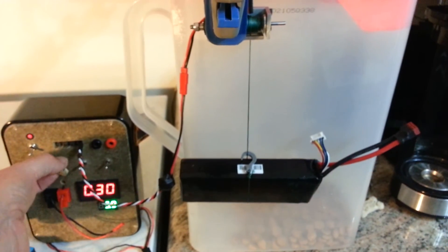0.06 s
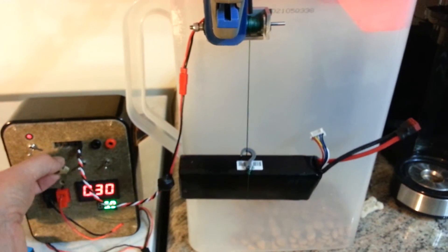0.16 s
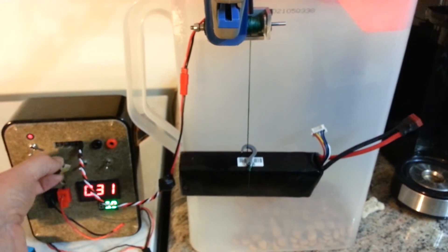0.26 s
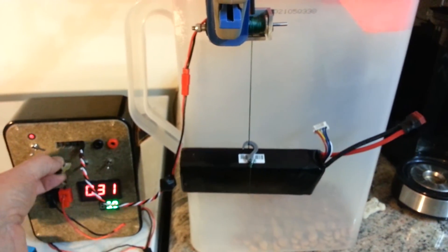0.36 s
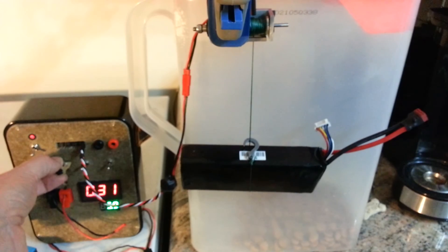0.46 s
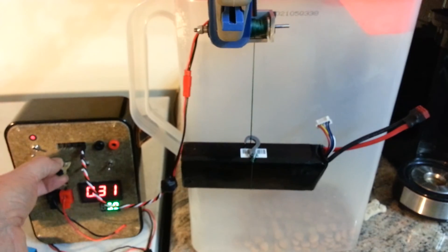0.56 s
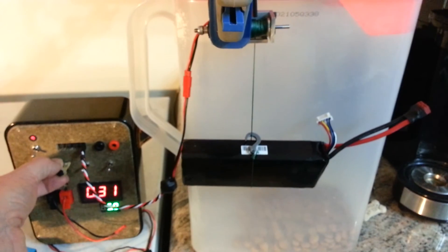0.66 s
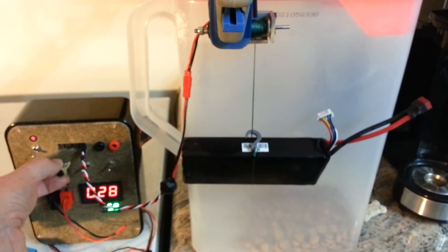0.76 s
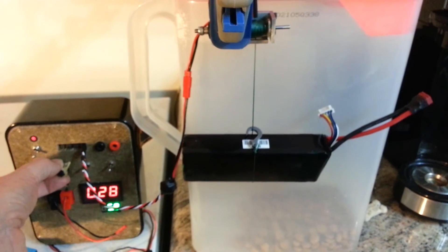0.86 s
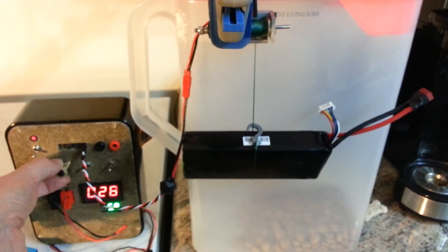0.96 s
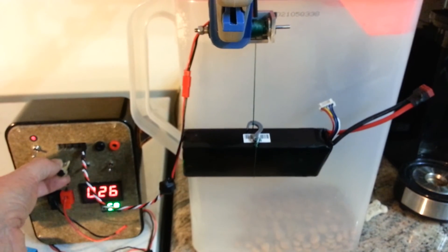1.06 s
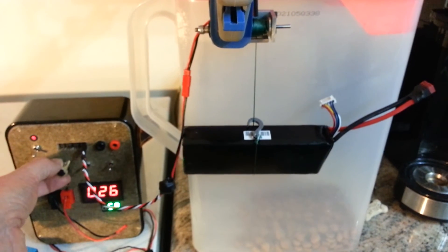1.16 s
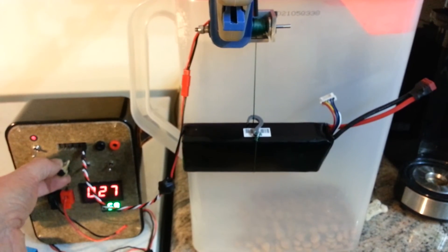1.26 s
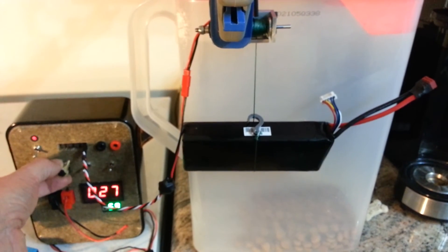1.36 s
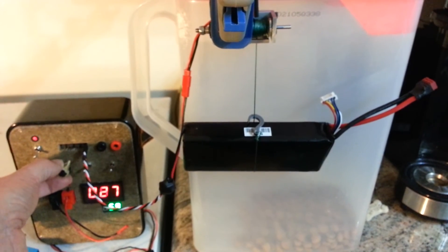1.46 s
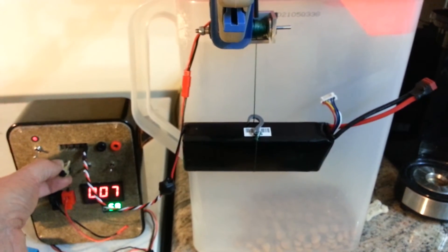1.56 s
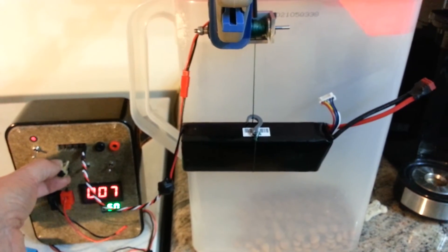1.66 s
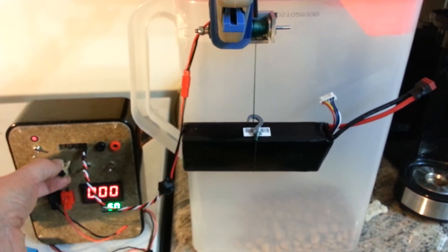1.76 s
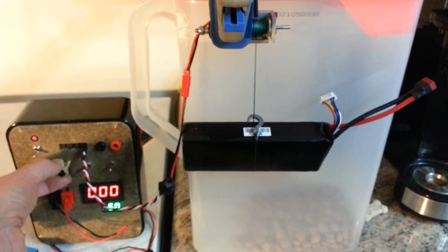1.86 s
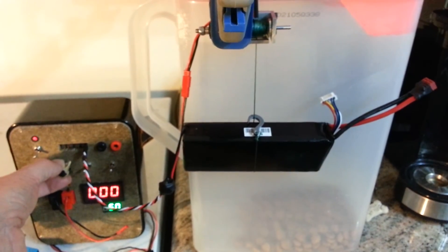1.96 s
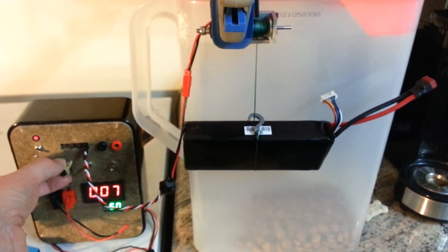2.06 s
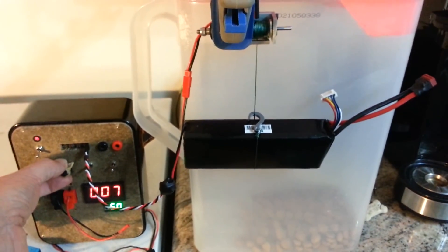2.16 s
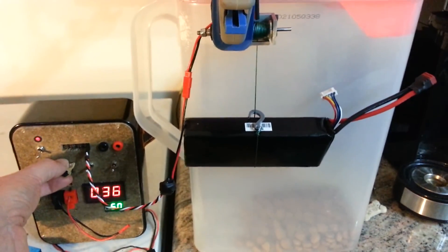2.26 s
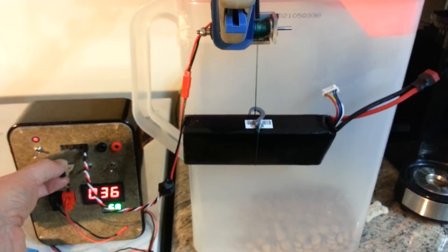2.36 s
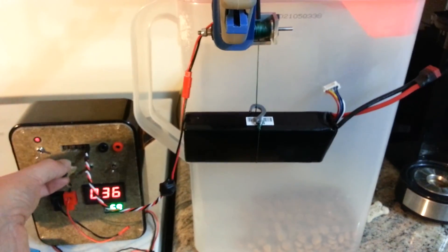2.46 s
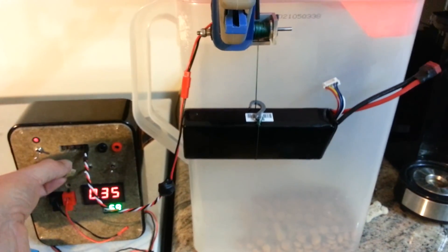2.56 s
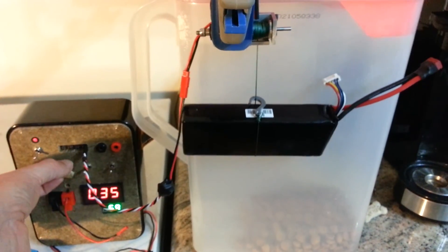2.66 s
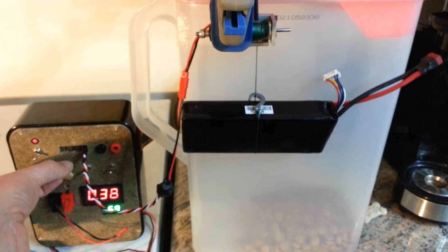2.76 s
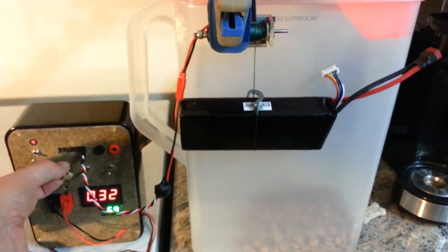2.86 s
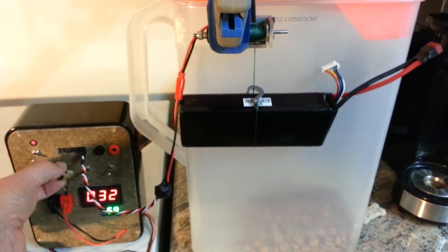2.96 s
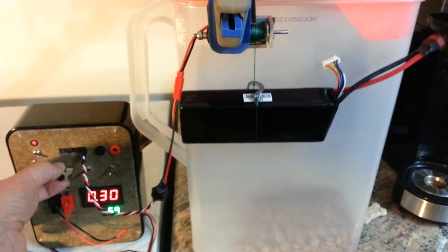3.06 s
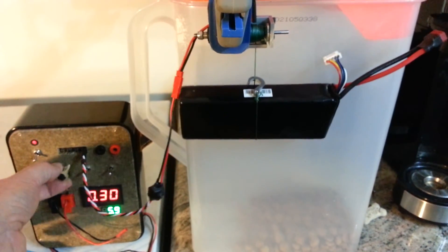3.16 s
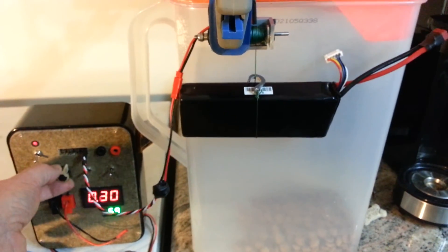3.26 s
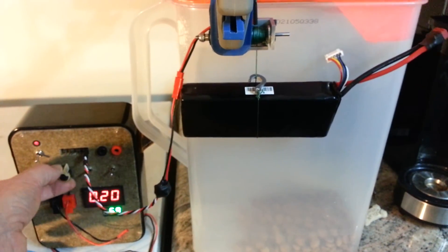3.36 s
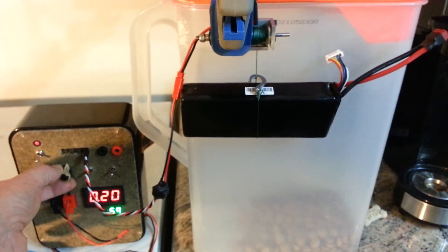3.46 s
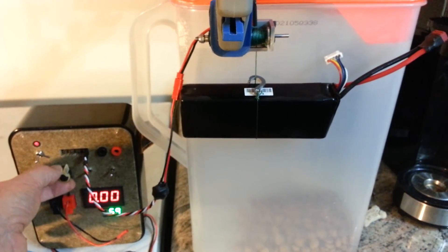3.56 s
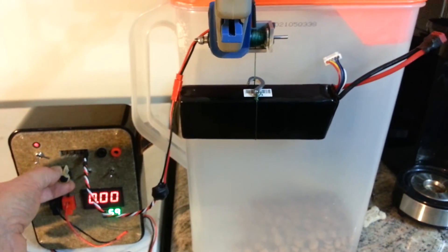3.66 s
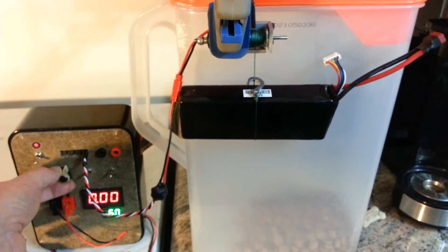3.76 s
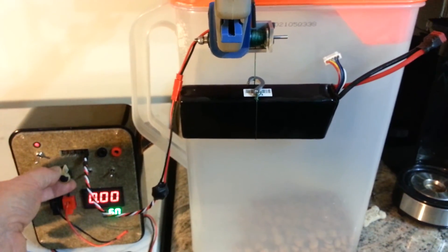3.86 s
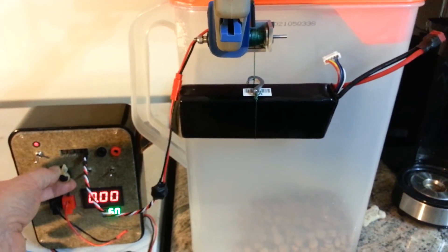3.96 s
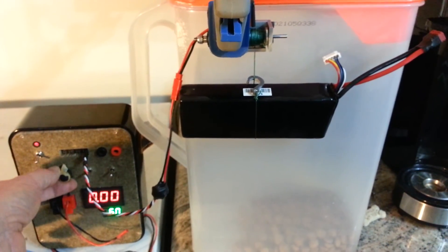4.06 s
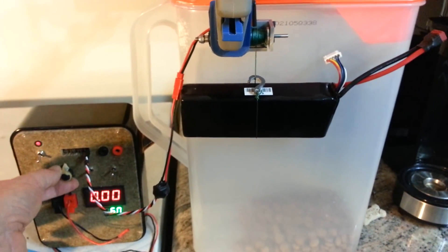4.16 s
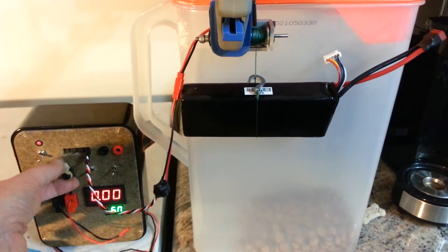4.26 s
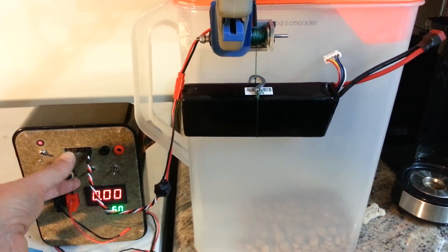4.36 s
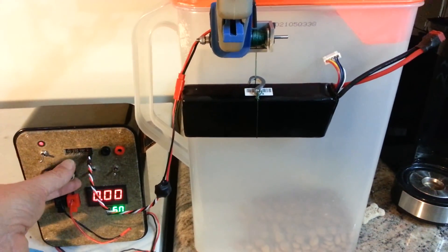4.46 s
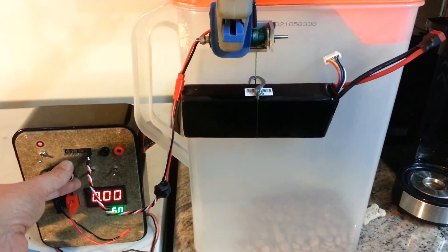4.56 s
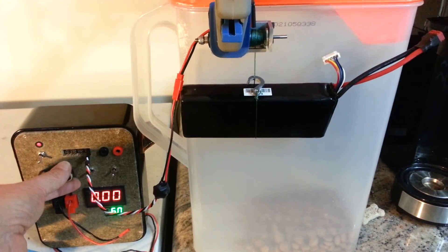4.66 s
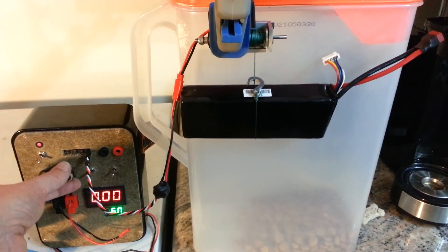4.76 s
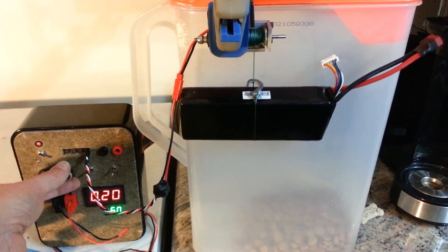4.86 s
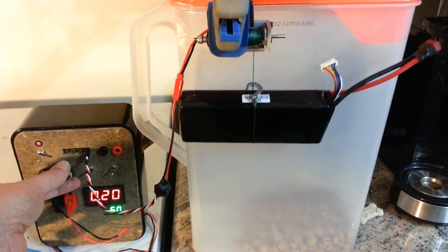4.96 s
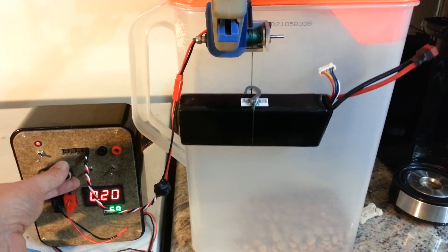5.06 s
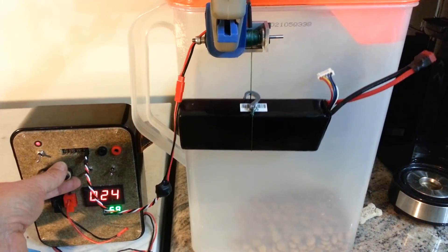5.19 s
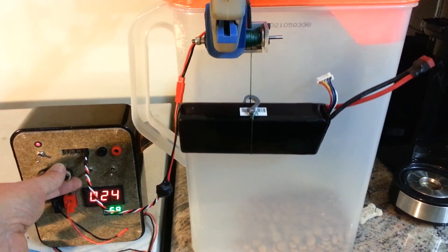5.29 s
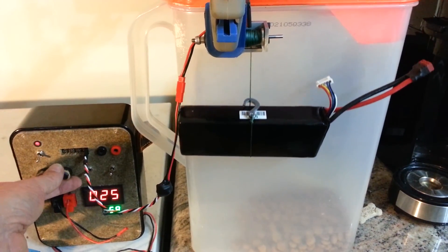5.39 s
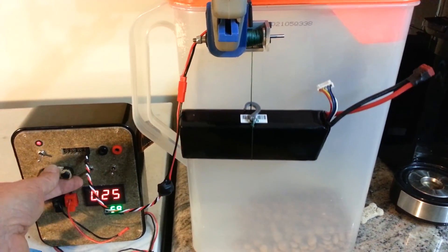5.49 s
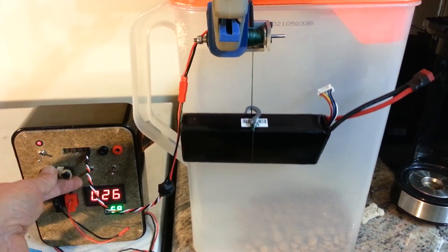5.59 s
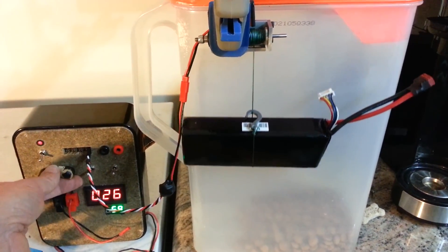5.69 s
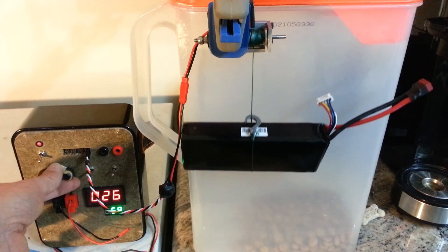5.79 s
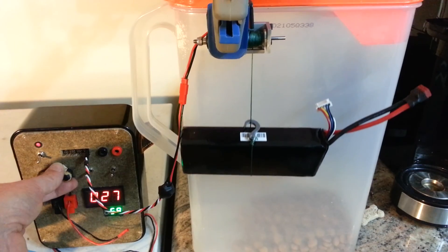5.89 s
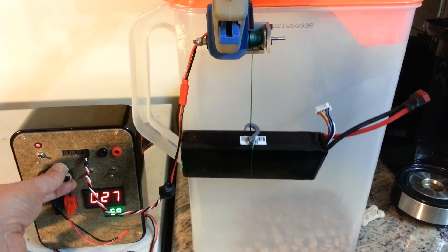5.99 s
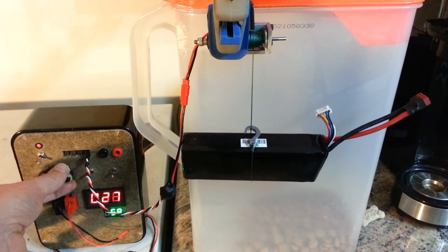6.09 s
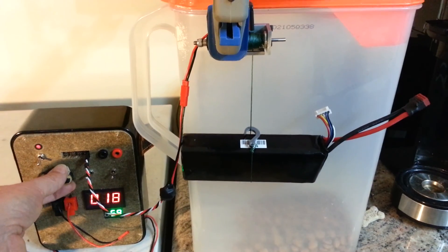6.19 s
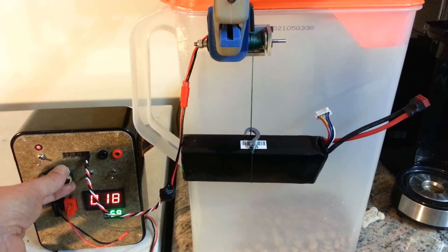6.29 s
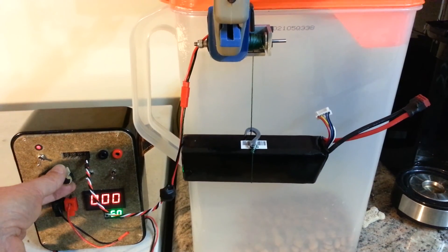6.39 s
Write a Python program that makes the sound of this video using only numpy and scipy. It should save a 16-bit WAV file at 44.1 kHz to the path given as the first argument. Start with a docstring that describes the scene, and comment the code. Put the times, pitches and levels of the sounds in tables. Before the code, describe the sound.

A tiny geared electric motor whines and rattles in three short runs, its pitch rising and falling, in a quiet kitchen.

```python
"""First comes the high whine of a tiny geared winch over a kitchen counter. It lifts a light load twice,
then lowers it. Its motor is fed in pulses, so the whine flutters at part throttle and turns pure near
full speed. The teeth rattle in the gearbox, more so when lowering, and the load and the hand give soft
bumps. Behind it all are a few faint ticks, soft air noise and the hum of an appliance."""
import sys
import numpy as np
from scipy import signal
from scipy.fft import rfft, irfft, next_fast_len
from scipy.io import wavfile

SR = 44100
rng = np.random.default_rng(int(sys.argv[2]) if len(sys.argv) > 2 else 0)


def generate_wav(signal):
    """Clip the signal to [-1, 1] and save it as 16-bit WAV at the path in sys.argv[1]."""
    frames = np.transpose(np.atleast_2d(signal))
    scaled = np.clip(frames, -1, 1) * 32767
    pcm = np.round(scaled).astype(np.int16)
    wavfile.write(sys.argv[1], SR, pcm)


N = 283563
TIME = np.arange(N) / SR
PADDED = next_fast_len(N + SR)
FREQS = np.maximum(np.fft.rfftfreq(PADDED, 1 / SR), 1)
PINION_TEETH, WHEEL_TEETH = 10, 61   # the small gear on the motor shaft, and the big one it drives
PULSE_HZ, FULL_SPEED_HZ = 61.2, 306   # supply pulses per second; shaft turns per second

# The hand turns the throttle for each lift. Each row: time in seconds, shaft turns per second.
FIRST_LIFT_SPEED = [(0, 299), (0.1, 299), (0.36, 295), (0.5, 288), (0.6, 270), (0.74, 247), (0.95, 224),
                    (0.99, 191), (1.27, 192), (1.343, 126)]
SECOND_LIFT_SPEED = [(1.952, 30.02), (2.08, 129.4), (2.18, 173.8), (2.3, 193.5), (2.6, 286.4),
                     (2.73, 300.9), (3.03, 301.3), (3.14, 291.9), (3.22, 250.5), (3.287, 165)]
# The tone colour of the rattle when lifting. Each row: frequency in Hz, relative level in dB.
LIFT_RATTLE = [(220, -7.5), (400, -6.5), (850, -24.5), (1200, -21.5), (1700, -17.5), (2500, -11),
               (3400, 1.5), (4600, 10), (5800, -0.5), (7200, -12.5), (8500, -14), (10800, -23),
               (12300, -18), (14000, -39)]


def lifts():
    """Winding in twice: the load holds the teeth together, so the whine is clear and the rattle even."""
    sound = 0
    for run, ring_db, rattle_db in ((FIRST_LIFT_SPEED, -25.5, -33), (SECOND_LIFT_SPEED, -26, -32)):
        levels = gear_levels(speed_of(run), hum_db=-50, whine_db=-30.5, whine_slope=27.5,
                             ring_db=ring_db, above_slope=39.5, rattle_db=rattle_db, rattle_slope=4.5)
        sound += winch(run, levels, LIFT_RATTLE, going_down=False,
                       rough=.2, slop=.076, looseness=.45, hiss_db=1.5)
    return sound


# The motor speed on the way down. Each row: time in seconds, shaft turns per second.
LOWERING_SPEED = [(4.73, 44.9), (4.77, 125.3), (4.86, 215.5), (4.96, 236.4), (5.13, 248.1), (5.3, 248.1),
                  (5.42, 281.3), (5.55, 293), (5.86, 286.8), (6, 235), (6.093, 176.1)]
# The tone colour of the rattle when lowering. Each row: frequency in Hz, relative level in dB.
LOWERING_RATTLE = [(220, -22.5), (400, -20), (850, -48.5), (1200, -35.5), (1700, -31), (2500, -20.5),
                   (3400, -12), (4600, 3), (5800, -8), (7200, -17.5), (8500, -25), (10800, -34.5),
                   (12300, -40), (14000, -60.5)]


def lowering():
    """Letting the load down: the teeth run loose, so they screech more and rattle harder with speed."""
    levels = gear_levels(speed_of(LOWERING_SPEED), hum_db=-54, whine_db=-31.5, whine_slope=19,
                         ring_db=-28.5, above_slope=14, rattle_db=-25, rattle_slope=7.5)
    return winch(LOWERING_SPEED, levels, LOWERING_RATTLE, going_down=True,
                 rough=.22, slop=.22, looseness=1.7, hiss_db=.5)


def winch(run, levels, colour, going_down, rough, slop, looseness, hiss_db):
    """One run of the motor: the gears whine, rattle and hiss, and the unbalanced shaft hums."""
    start, stop, speed = run[0][0], run[-1][0], speed_of(run)
    hum_db, whine_db, octave_db, rattle_db = levels
    running = np.clip(np.minimum((TIME - start) / .0028 + 1, (stop - TIME) / .024 + .5), 0, 1)
    pulse_age = (TIME - start) * PULSE_HZ % 1   # goes from 0 to 1 between supply pulses
    turns, load = shaft(speed, pulse_age)
    part_throttle = np.clip((FULL_SPEED_HZ - speed) / 70, .35, 1)
    singing = np.clip((speed - 80) / 60, 0, 1)   # very slow gears do not sing
    crawl = np.clip(1 - speed / 230, 0, 1)

    whine = from_db(whine_db) * gear_tone(turns, PINION_TEETH, rough, slop)
    whine += from_db(octave_db) * whine_octave(turns, part_throttle, looseness, rough, slop)
    whine += from_db(whine_db) * side_tones(turns, going_down, rough, slop)
    hum = from_db(hum_db) * gear_tone(turns, 1, rough=.06, slop=.015)
    tones = singing * (load * whine + hum)
    growl = bracket_growl(crawl)

    overtones = from_db(-9.5) * gear_tone(turns, 3 * PINION_TEETH, rough=.4, slop=.6)
    overtones += from_db(-15) * gear_tone(turns, 4 * PINION_TEETH, rough=.4, slop=.57)
    overtones *= singing * load * part_throttle
    force = running * from_db(rattle_db) * jolts(crawl, pulse_age)
    rattle = coloured(force * (tooth_knocks(turns) + overtones), colour)
    hiss = coloured(force * rng.standard_normal((2, N)), colour)   # the teeth slide over each other
    return gear_colour(running * (tones + growl) + rattle, hiss, hiss_db)


def speed_of(run):
    """Shaft turns per second at every sample."""
    return np.interp(TIME, *np.transpose(run))


def shaft(speed, pulse_age, max_flutter_hz=11.5):
    """Turns made and load on the teeth: each pulse speeds the motor up, then it coasts until the next."""
    duty = np.clip((speed / FULL_SPEED_HZ) ** 3, .15, .85)   # share of the time the power is on
    sawtooth = 2 * np.minimum(pulse_age / duty, (1 - pulse_age) / (1 - duty)) - 1
    flutter = np.clip(.33 * (FULL_SPEED_HZ - speed), 0, max_flutter_hz) * sawtooth
    turns = np.cumsum(speed * (1 + .00331 * drift(150)) + flutter) / SR
    wheel_turns = turns * PINION_TEETH / WHEEL_TEETH
    off_centre = 1 + .088 * np.sin(2 * np.pi * wheel_turns)
    return turns, (1 + .024 * flutter) * off_centre


def gear_tone(turns, per_turn, rough, slop):
    """A tone locked to the shaft. Play in the gears shakes its level (rough) and its timing (slop)."""
    return np.sqrt(2) * (1 + rough * drift(260)) * np.sin(2 * np.pi * per_turn * turns + slop * drift(520))


def whine_octave(turns, part_throttle, looseness, rough, slop):
    """The octave above the whine: a clean tone, strongest at part throttle, and a loose-tooth screech."""
    screech = gear_tone(turns, 2 * PINION_TEETH, rough=.2, slop=1.4)
    clean = gear_tone(turns, 2 * PINION_TEETH, rough, 2 * slop)
    return part_throttle * clean + looseness * screech


# Side tone pitches. Each row: multiple of the shaft rate, added multiple of the second gear's tooth rate.
SIDE_PITCHES = [(0, 2), (5, 0), (0, 4), (0, 5), (10, -1), (11, 0), (10, 1), (10, 2), (15, 0), (10, 4),
                (10, 5)]
# Their levels against the whine. Each row: dB when lifting, dB when lowering.
SIDE_LEVELS = [(-31, -25), (-23, -26), (-24, -28), (-21, -22), (-20, -22), (-9, -7), (-9, -8), (-11, -2),
               (-15, -9), (-16, -8), (-22, -18)]


def side_tones(turns, going_down, rough, slop):
    """The wheel carries a second small gear, whose tooth rate mixes with the shaft rate into more tones."""
    second_gear = PINION_TEETH * PINION_TEETH / WHEEL_TEETH   # its teeth per turn of the motor
    tones = 0
    for (shaft_multiple, gear_multiple), (up_db, down_db) in zip(SIDE_PITCHES, SIDE_LEVELS):
        per_turn = shaft_multiple + gear_multiple * second_gear
        tones += from_db(down_db if going_down else up_db) * gear_tone(turns, per_turn, rough, slop)
    return tones


# The teeth briefly chatter harder on the way down.
# Each row: middle in seconds, extra level in dB, half length in seconds.
TOOTH_CHATTERS = [(4.968, 4.5, 0.03), (5.36, 2, 0.032)]


def gear_levels(speed, hum_db, whine_db, whine_slope, ring_db, above_slope, rattle_db, rattle_slope):
    """Hum, whine, octave and rattle levels in dB follow the speed. Slopes are in dB per octave."""
    octaves = np.log2(speed / FULL_SPEED_HZ)
    chatter = sum(db * bell(TIME, middle, half_length) for middle, db, half_length in TOOTH_CHATTERS)
    whine = whine_db + whine_slope * octaves + 1.5 * bell(speed, 296, 15)   # a resonance near full speed
    octave = octave_level(speed, ring_db, above_slope)
    creep_loss = 5 * np.clip(1 - speed / 135, 0, 1)   # slow teeth barely touch
    rattle = rattle_db + rattle_slope * octaves - creep_loss
    return hum_level(speed, hum_db), whine, octave + chatter, rattle + chatter


def octave_level(speed, ring_db, above_slope, below_slope=37, low_hz=3997, high_hz=4590):
    """The whine's octave is loudest in the band where the gearbox rings, and fades on either side."""
    hz = 2 * PINION_TEETH * speed
    below, above = np.maximum(np.log2([low_hz / hz, hz / high_hz]), 0)
    return ring_db - below_slope * below - above_slope * above


def hum_level(speed, base_db, db_per_octave=14):
    """The shaft's hum grows with speed and swells at two resonances of the mount."""
    swell_db = 11 * bell(speed, centre=296, width=37) + 12 * bell(speed, centre=206, width=22)
    return base_db + db_per_octave * np.log2(speed / FULL_SPEED_HZ) + swell_db


def tooth_knocks(turns, chance=.92, pinion_share=.47):
    """One knock per tooth. Its strength is partly random and partly repeats as each gear comes round."""
    teeth = turns * PINION_TEETH
    at = np.flatnonzero(np.diff(np.floor(teeth)))   # the sample just before each knock
    tooth, step = teeth[at + 1].astype(int), teeth[at + 1] - teeth[at]
    wheel, pinion = rng.standard_normal(WHEEL_TEETH), rng.standard_normal(PINION_TEETH)
    force = (wheel - wheel.mean())[tooth % WHEEL_TEETH]
    force += pinion_share * rms_one(pinion - pinion.mean())[tooth % PINION_TEETH]
    force += chance * rng.standard_normal(N)[tooth]
    force = rms_one(force) / np.sqrt(step)
    late = (tooth - teeth[at]) / step   # knocks fall between samples
    return rms_one(np.bincount(at, force * (1 - late), N) + np.bincount(at + 1, force * late, N))


def jolts(crawl, pulse_age, strength=2.4, decay=3.3):
    """At a crawl, each supply pulse throws the gears across their slack, so the rattle throbs."""
    return 1 + strength * crawl * (np.exp(-decay * pulse_age) - 1 / decay)


def bracket_growl(crawl):
    """The bracket growls softly while the motor crawls."""
    return from_db(-55) * np.sqrt(crawl) * rms_one(band(rng.standard_normal(N), 685, 1026))


# Peaks and dips in the tone colour of the gear sound. Each row: frequency in Hz, width in Hz, gain in dB.
GEAR_PEAKS_AND_DIPS = [(563, 122, -5.5), (885, 290, 10.5), (1080, 720, -7.5), (2670, 150, 2.5),
                       (2780, 106, -14.5), (3430, 44, 2), (4100, 53, 12.5), (4180, 280, -9.5),
                       (3860, 31, 4), (4610, 170, -2), (5170, 96, 2), (5000, 30, 7), (5380, 24, 10.5),
                       (7140, 300, 5)]
# Which side is louder. Each row: frequency in Hz, left minus right in dB.
STEREO_BALANCE = [(300, 0.5), (850, 2.5), (1230, -4.5), (2400, 3.5), (3000, -4), (3500, -0.5), (3800, 3),
                  (4300, -2.5), (4900, -7.5), (5400, -4.5), (6000, 2.5), (7200, 1), (9000, 4.5),
                  (12000, 5.5)]
# Which side the gear sound reaches first. Each row: frequency in Hz, lead of the left in radians.
STEREO_LEAD = [(860, 0), (1460, -1.5), (2240, -.1), (3010, -.5), (3900, -1.4), (4820, -2.2), (5900, -1.5),
               (7000, -.8), (8400, -1.7)]
# Extra colour for the hiss of the sliding teeth. Each row: frequency in Hz, relative gain in dB.
SLIDING_HISS = [(300, -6.5), (1200, 9.5), (3000, 7), (5500, -11.5), (9000, 2.5)]


def gear_colour(gears, hiss, hiss_db):
    """Tones swell and fade as they glide over peaks and dips, and reach each ear by a different path."""
    colour_db = sum(db / (1 + (2 * (FREQS - hz) / width) ** 2) for hz, width, db in GEAR_PEAKS_AND_DIPS)
    sides = np.array([[.5], [-.5]])
    pan = from_db(sides * at_hz(STEREO_BALANCE))
    path = from_db(colour_db) * pan / np.sqrt(np.mean(pan ** 2, axis=0))
    gear_path = path * np.exp(1j * sides * at_hz(STEREO_LEAD))
    hiss_path = path * from_db(at_hz(SLIDING_HISS) + hiss_db)
    return filtered(gears, gear_path) + filtered(hiss, hiss_path)


# Soft bumps. Each row: start in seconds, level in dB, pitch in Hz, seconds to fade by 60 dB.
LOAD_BUMPS = [(0.789, -32.5, 179, 0.029), (5.635, -31, 720, 0.014), (5.636, -31.5, 1630, 0.018)]


def bumps():
    """The swinging load and the hand make bumps that ring very briefly."""
    sound = np.zeros(N)
    for start, level_db, hz, fade_s in LOAD_BUMPS:
        age = np.clip(TIME - start, 0, 10 * fade_s)
        sound += from_db(level_db - 60 * age / fade_s) * np.sin(2 * np.pi * hz * age)
    return sound


# Faint ticks between the runs. Each row: start in seconds, level in dB.
FAINT_TICKS = [(1.603, -56), (3.599, -55), (4.605, -58.5)]


def ticks(fade_s=.31):
    """Small, blurred ticks, each a burst of noise that dies away."""
    level = sum((TIME >= start) * from_db(db - 60 * np.abs(TIME - start) / fade_s)
                for start, db in FAINT_TICKS)
    return level * rms_one(band(rng.standard_normal((2, N)), 900, 7000))


def kitchen_echo(sound):
    """Quick scatter from the counter and a plastic tub, then the short tail of the room."""
    t, response = TIME[:SR], 0
    for level_db, fade_s in ((-15, .08), (-16, .4)):
        echoes = rng.standard_normal((2, SR)) * from_db(-60 * t / fade_s) * (t > .002)
        response += from_db(level_db) * rms_one(echoes) / np.sqrt(SR)
    return filtered(sound, rfft(band(response, 400, 10000), PADDED))


# The tone colour of the room's air. Each row: frequency in Hz, relative level in dB.
AIR_COLOUR = [(15, -62.5), (25, -23.5), (49, -18.5), (152, -6), (227, 0.5), (259, -0.5), (386, -4.5),
              (856, -15.5), (1120, -15.5), (1460, -19), (4940, -23.5), (6110, -27.5), (14300, -26.5)]
# How alike the air sounds left and right. Each row: frequency in Hz, likeness from 0 to 1.
AIR_STEREO = [(60, 0.22), (230, 0.46), (910, 0.1), (3550, 0.024), (13800, 0.033)]


def room_air():
    """Soft, wide noise fills the quiet room."""
    alike = at_hz(AIR_STEREO)
    middle, side = rng.standard_normal((2, N))
    spread = filtered(side, np.sqrt((1 - alike) / (1 + alike))) * [[1], [-1]]
    return from_db(-58.5) * coloured(.98 * middle + spread, AIR_COLOUR)


# The tones of the appliance. Each row: pitch in Hz, level in dB.
APPLIANCE_TONES = [(59.2, -72), (118.4, -82), (178, -77), (236.9, -77), (387.6, -66), (473.7, -72.5),
                   (2374, -81), (5098, -80)]


def appliance_hum():
    """An appliance hums in steady tones that waver very slightly."""
    return sum(from_db(db) * np.sqrt(2) * np.sin(2 * np.pi * hz * TIME + .12 * drift(9.3))
               for hz, db in APPLIANCE_TONES)


def from_db(db):
    """Turn decibels into a gain."""
    return 10 ** (np.asarray(db) / 20)


def rms_one(x):
    """Scale a signal to an average power of 1."""
    return x / np.sqrt(np.mean(x ** 2) + 1e-20)


def bell(x, centre, width):
    """A smooth hump of height 1."""
    return np.exp(-((x - centre) / width) ** 2)


def drift(rate):
    """A random wander of size about 1 that turns `rate` times a second."""
    return rms_one(np.interp(TIME * rate, np.arange(N), rng.standard_normal(N)))


def at_hz(points):
    """Join a table's rows into a curve over all frequencies, with octaves evenly spaced."""
    hz, values = np.transpose(points)
    return np.interp(np.log(FREQS), np.log(hz), values)


def filtered(x, response):
    """Give each frequency its own gain."""
    return irfft(rfft(x, PADDED) * response, PADDED)[..., :N]


def band(x, low_hz, high_hz):
    """Gently keep what lies between two frequencies."""
    return signal.sosfilt(signal.butter(2, [low_hz, high_hz], "band", fs=SR, output="sos"), x)


def coloured(x, colour):
    """Give white noise a tone colour at the same power; nothing passes far below the first row."""
    gain = from_db(at_hz(colour)) / np.hypot(1, (colour[0][0] / FREQS) ** 4)
    return filtered(x, rms_one(gain))


def scene():
    """Two lifts and one lowering in the quiet kitchen."""
    near = lifts() + lowering() + bumps()
    return near + kitchen_echo(near) + ticks() + room_air() + appliance_hum()


def record(dry, cutoff_hz=14400):
    """The highest treble is cut off steeply."""
    return signal.sosfilt(signal.ellip(10, .1, 80, cutoff_hz, fs=SR, output="sos"), dry)


dry = scene()
out = record(dry)
generate_wav(out)
```